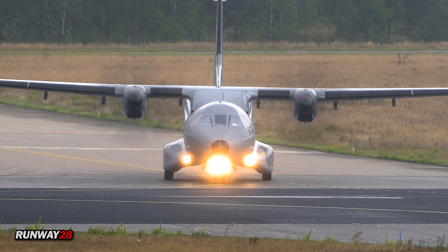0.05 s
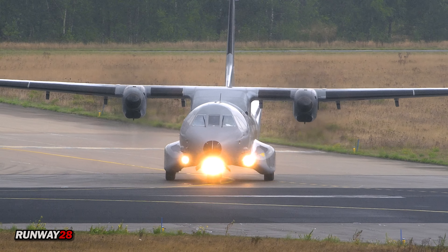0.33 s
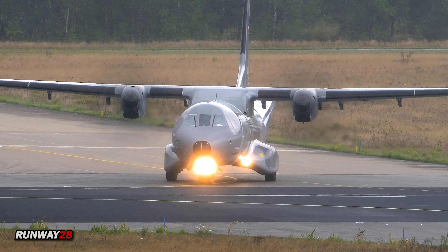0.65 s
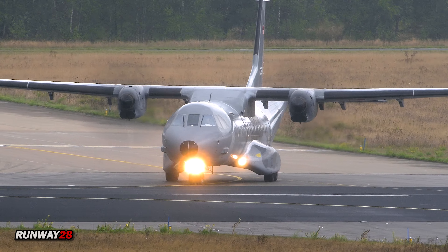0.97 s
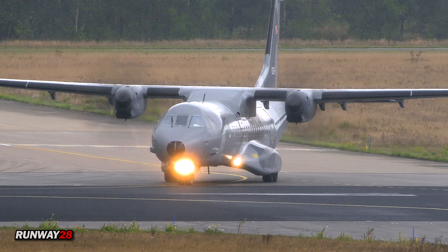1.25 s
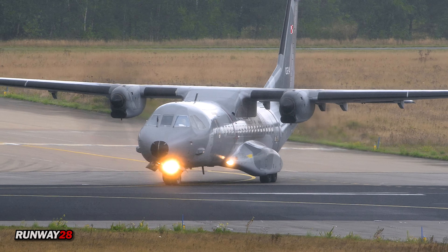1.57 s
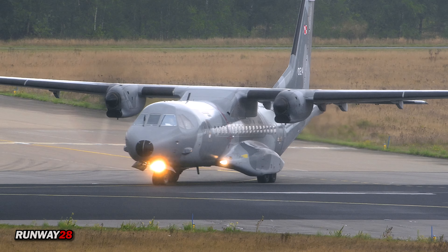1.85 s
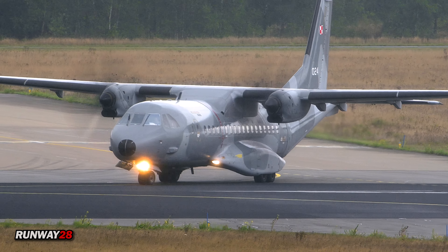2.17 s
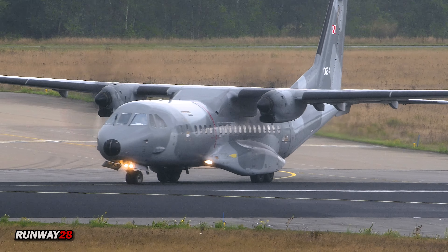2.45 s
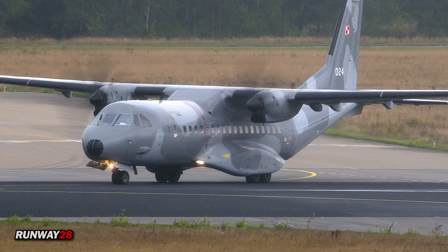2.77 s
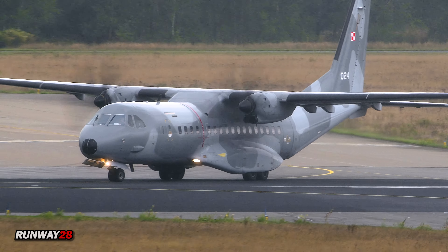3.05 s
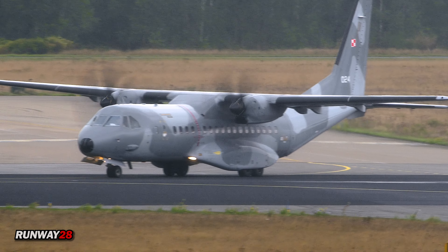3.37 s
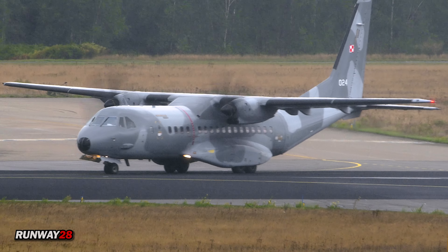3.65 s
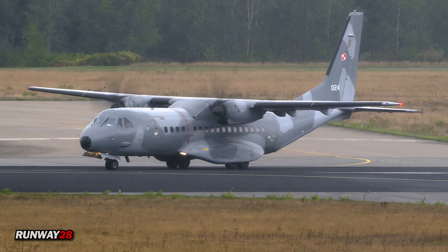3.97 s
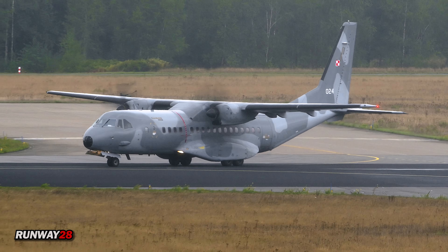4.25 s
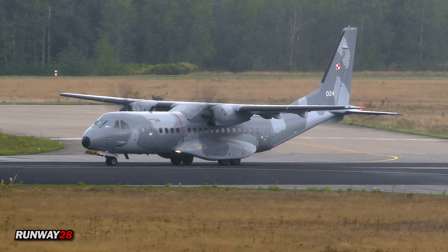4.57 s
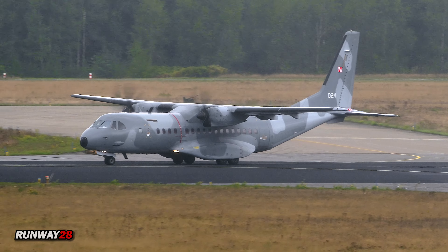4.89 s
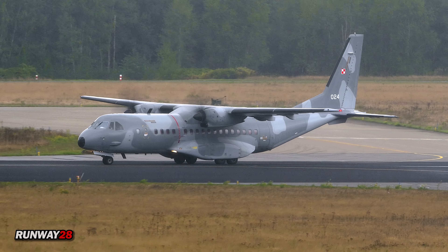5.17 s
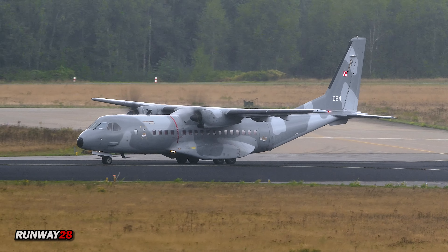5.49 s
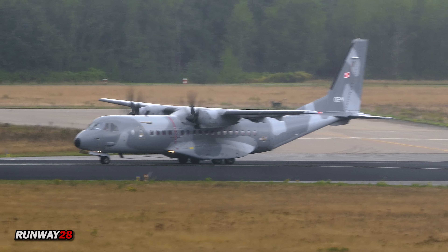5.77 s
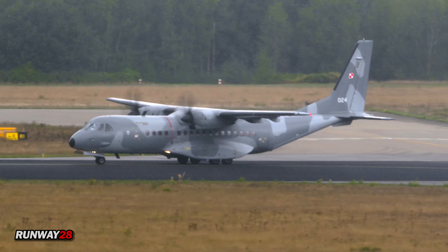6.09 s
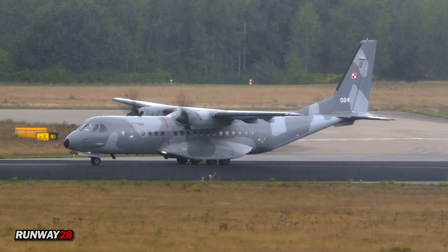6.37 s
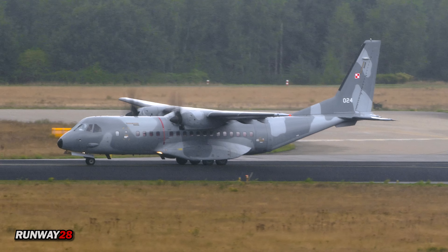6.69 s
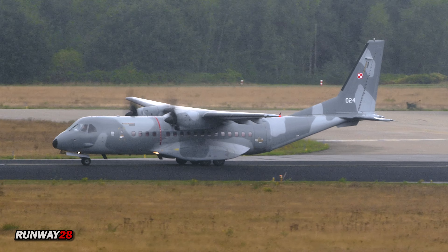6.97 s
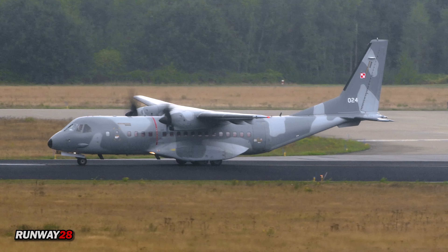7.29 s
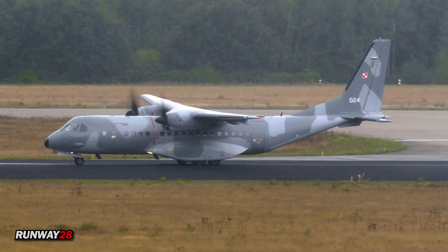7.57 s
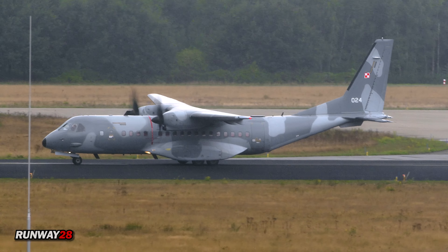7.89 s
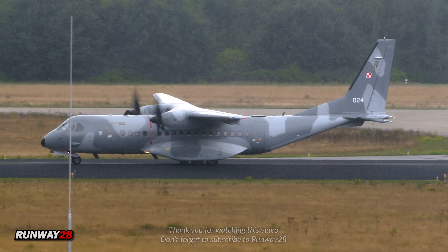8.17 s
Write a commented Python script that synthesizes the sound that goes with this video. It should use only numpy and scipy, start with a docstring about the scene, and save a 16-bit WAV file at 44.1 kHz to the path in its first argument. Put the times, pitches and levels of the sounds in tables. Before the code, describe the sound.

A continuous rushing roar and low propeller drone carry across an airfield to a distant microphone as a twin-engine transport plane taxis through a turn. The hum pulses at first, then grows buzzier, coming and going in waves while the roar wavers gently. One engine eases back slightly. Near the end an airy hiss rises and falls, and a faint high whine emerges as the throttle opens.

```python
"""An airfield, the microphone far off: a twin turboprop taxis towards it and turns side-on.
Two propellers hum at slightly different speeds inside the roar of their wash and the exhausts.
Their sound is beamed, so tones and bands of noise come and go as the nose swings away.
The intake hiss swells late in the turn; a thin turbine whine comes out as the throttle opens."""
import sys
import numpy as np
from scipy import signal
from scipy.fft import rfft, irfft
from scipy.io import wavfile
from scipy.ndimage import uniform_filter1d, minimum_filter1d

SR = 44100
rng = np.random.default_rng(int(sys.argv[2]) if len(sys.argv) > 2 else 0)


def pcm_store(signal):
    """Save signal as 16-bit PCM."""
    levels = np.round(np.clip(np.atleast_2d(signal), -1, 1) * 32767)
    wavfile.write(sys.argv[1], SR, levels.astype(np.int16).T)


N = 363384
T = np.arange(N) / SR
FREQS = np.fft.rfftfreq(N, 1 / SR)

# the turn: t/s, angle between nose and microphone/deg
HEADING = [(0, 2), (2, 28), (3, 39), (8.24, 80)]
# the high wash, coming and going on the wind: t/s, relative level/dB
WASH_LEVEL = [(0, -15), (1.5, -16), (2.0, -15), (2.7, -16), (3.7, -13), (4.8, -15), (5.5, -14),
              (6.6, -16.5), (8.24, -17.5)]


def amp(db):
    return 10 ** (np.asarray(db) / 20)


def unit(x):
    return x / np.sqrt(np.mean(x ** 2) + 1e-20)


def bell(x, middle, width):
    """A smooth hump of height 1."""
    return np.exp(-(2 * (x - middle) / width) ** 2)


def step(x, softness):
    """A smooth rise from 0 to 1 as x passes zero."""
    return .5 + .5 * np.tanh(x / softness / 2)


def curves(rows, t=T):
    """Each column of a table, joined by straight lines in time."""
    s, *columns = np.transpose(rows)
    return [np.interp(t, s, column) for column in columns]


def coloured(noise, spectrum):
    """Noise filtered by rows of f/Hz, gain/dB, joined on a log-frequency axis."""
    hz, db = np.transpose(spectrum)
    return irfft(rfft(noise) * amp(np.interp(np.log(FREQS + 1), np.log(hz + 1), db)), N)


def drift(rate_hz):
    """Smooth random motion of unit size, up to about the given rate."""
    return unit(irfft(rfft(rng.standard_normal(N)) * np.exp(-.5 * (FREQS / rate_hz) ** 2), N))


def whistle(hz, width_hz):
    """A narrow band of noise around a moving pitch."""
    carrier = np.exp(2j * np.pi * np.cumsum(hz) / SR)
    return unit((carrier * (drift(width_hz / 2) + 1j * drift(width_hz / 2))).real)


def swelling(name, steady):
    """A tone's steady gain with its swells on top, added as power."""
    # moments when a tone swells at the microphone: tone, middle t/s, length/s, level/dB
    swells = [("right bass", 0, .4, -41.5), ("right bass", 1.2, .55, -45.5), ("right thrust", .05, .3, -21),
              ("right thrust", .56, .22, -21), ("right thrust", 1.42, 0.55, -24.5),
              ("right thrust", 1.9, 0.18, -28), ("left hum", 1.56, 0.26, -18),
              ("left hum", 2.3, .18, -20.5), ("left hum", 2.78, 0.61, -18.5),
              ("left hum", 3.3, 0.22, -20.5), ("left hum", 7.68, 0.45, -19), ("left buzz", 1.35, 0.94, -23),
              ("left buzz", 2.3, .4, -24), ("left buzz", 2.9, 0.99, -20), ("right buzz", 4.5, 0.4, -19.5),
              ("right buzz", 4.88, 0.27, -20.5), ("right buzz", 5.18, 0.29, -16.5),
              ("right buzz", 6.18, 0.3, -18), ("right buzz", 7.2, .2, -23), ("right buzz", 7.83, .7, -20.5),
              ("whine", 1.3, 0.42, -65), ("whine", 3.1, .45, -66), ("whine", 4.0, .4, -64.5),
              ("whine", 7.15, .3, -66), ("whine", 7.6, .45, -60.5)]
    power = sum((amp(db) * bell(T, s, length)) ** 2 for tone, s, length, db in swells if tone == name)
    return np.sqrt(steady ** 2 + power)


def electronics():
    """The faint, wavering whine of the recorder's own circuits."""
    # its tones: f/Hz, level/dB
    tones = [(6000, -76.5), (7000, -83), (8000, -89), (9000, -98), (10000, -98), (11000, -100),
             (12000, -101)]
    return sum(amp(db) * unit((1 + .6 * drift(1.5)) * np.sin(2 * np.pi * hz * T)) for hz, db in tones)


def stereo_spread():
    """A trace of noise in opposite sign on the two channels, rising and falling with the wash."""
    # its spectrum: f/Hz, relative level/dB
    spectrum = [(100, -65.5), (300, -35.5), (500, -23.5), (700, -13.5), (1000, 2.5), (1350, -1.5),
                (1850, -14), (3600, -11.5), (4600, -25), (6000, -56), (10000, -100)]
    noise = coloured(rng.standard_normal(N), spectrum)
    return amp(-51.5) * np.outer([1, -1], unit(noise * amp(curves(WASH_LEVEL)[0])))


def turbine():
    """The compressor's whine: a narrow core in a wide, airy skirt, louder once the throttle opens."""
    # turbine speed, heard as pitch: t/s, f/Hz
    pitch = [(0, 5420), (3.85, 5360), (4.4, 5050), (6.2, 4600), (6.9, 5020), (7.35, 5460), (7.7, 5510),
             (8.24, 5420)]
    idle_db, power_db, throttle_s = -71, -60.5, 7.28
    hz = curves(pitch)[0] * (1 + .0018 * drift(9))
    db = idle_db + (power_db - idle_db) * step(T - throttle_s, softness=.08)
    return swelling("whine", amp(db)) * unit(whistle(hz, width_hz=45) + whistle(hz, width_hz=260))


def swishes():
    """Short gliding whistles of air that rise out of the wash."""
    # each swish: middle t/s, length/s, start f/Hz, end f/Hz, width/Hz, level/dB
    glides = [(0.422, 0.37, 835, 838, 59, -19), (6.322, 0.13, 3020, 3000, 350, -32.5),
              (6.861, 0.12, 3440, 2700, 400, -34), (7.217, .1, 2670, 3200, 200, -44.5)]
    out = np.zeros(N)
    for s, length, start_hz, end_hz, width_hz, db in glides:
        hz = np.interp((T - s) / length, [-.5, .5], [start_hz, end_hz])
        out += amp(db) * bell(T, s, length) * whistle(hz, width_hz)
    return out


def moving_band(rows, t, hz, width):
    """Lift or dip in dB of a band gliding through the roar; its width is a share of its centre pitch."""
    centre_hz, db = curves(rows, t)
    return db[:, None] * bell(hz / centre_hz[:, None], 1, width)


def roar_parts(t):
    """Centre pitch and relative dB over time of each part of the roar, from low to high."""
    # each part is thrown one way: name -> f/Hz, angle off the nose/deg, beam width/deg, gain/dB
    beams = {"rumble": (39, 3, 100, 6), "low drone": (140, 38, 56, 3.2), "exhaust": (250, 69, 71, 3),
             "low wash": (520, 28, 32, 2.1), "mid wash": (660, 15, 60, 1.7),
             "blade hiss": (1830, 62, 4.3, 1.3), "fizz": (4800, 63, 53, 4.2)}
    # the intake hiss: t/s, relative level/dB
    hiss_level = [(0, -26.5), (0.4, -34.5), (.7, -33), (1.7, -30.5), (2.1, -36.5), (2.7, -33.5),
                  (3.5, -35.5), (4.3, -32.5), (5.6, -31.5), (6.3, -28.5), (6.52, -28), (6.83, -25.5),
                  (7.15, -32), (8.24, -33.5)]
    wash_hz, hiss_hz = 1300, 3200
    heading = curves(HEADING, t)[0]
    parts = [(hz, db * bell(heading, aim, width)) for hz, aim, width, db in beams.values()]
    parts += [(wash_hz, curves(WASH_LEVEL, t)[0]), (hiss_hz, curves(hiss_level, t)[0])]
    parts.sort(key=lambda part: part[0])
    part_hz, levels_db = map(np.array, zip(*parts))
    surge_db = 2 * bell(t, middle=3.08, width=.4)  # the treble brightens once in mid-turn
    return part_hz, levels_db + np.outer(part_hz > 1800, surge_db)


def roar(flutter):
    """Turbulent wash and exhaust, chopped by the blades; its parts swell and fade with heading and wind."""
    # colour at the microphone, the treble lost to the long air path: f/Hz, relative level/dB
    spectrum = [(70, -38), (108, -32), (155, -15), (195, -3.5), (265, 1), (390, -5.5), (560, -4.5),
                (820, -0.5), (1030, -0.97), (1400, -5.5), (1900, -14), (2350, -16.5), (3000, -24.5),
                (3750, -27.5), (4750, -45), (5450, -52), (6900, -63.5), (7600, -75), (11000, -87),
                (13500, -95)]
    # band coloured by the echo off the ground, moving with the aircraft: t/s, f/Hz, gain/dB
    ground_echo = [(0, 409, -5.5), (1.0, 405, -3), (1.3, 470, 3), (2.0, 468, -1), (2.55, 460, 2),
                   (3.1, 350, 1), (3.7, 386, 2.5), (4.3, 450, 2), (4.8, 440, -1.5), (5.6, 470, -1),
                   (6.4, 430, 1.5), (7.1, 520, -1), (7.6, 575, -3), (8.24, 591, -1.5)]
    # hollow resonance of the wash, wandering with the turn: t/s, f/Hz, gain/dB
    resonance = [(0, 780, 1), (.7, 798, 1), (1.3, 950, 0.5), (2.0, 1080, 2.5), (2.4, 1047, 0.5),
                 (2.8, 950, -1.5), (3.4, 1077, 0.5), (4.35, 1020, 1.8), (4.75, 1020, -0.5),
                 (5.3, 1030, 2.3), (5.6, 1060, 1.5), (6.0, 1050, -1), (6.8, 1020, -1.5), (7.4, 970, 1.5),
                 (8.24, 970, 1)]
    window, hop = 1024, 256
    gust_db, gust_s = .17, .36  # wind along the path makes each part waver on its own
    frames, hz = N // hop + 5, np.fft.rfftfreq(window, 1 / SR)
    t = np.arange(frames) * hop / SR
    real, imag, patches = rng.standard_normal((3, frames, len(hz)))
    patches = uniform_filter1d(patches, size=22, axis=0)
    field_db = unit(uniform_filter1d(patches, size=9, axis=1))  # 1 dB patches in time and pitch
    field_db += moving_band(ground_echo, t, hz, width=.3) + moving_band(resonance, t, hz, width=.23)
    part_hz, levels_db = roar_parts(t)
    gusts = rng.standard_normal((len(part_hz), frames))
    gusts = unit(uniform_filter1d(gusts, size=round(gust_s * SR / hop), axis=1))
    for level_db, gust, own in zip(levels_db, gusts, np.eye(len(part_hz))):
        reach = np.interp(np.log(hz + 1), np.log(part_hz), own)  # each part fades into its neighbours
        field_db += np.outer(level_db - level_db.mean() + gust_db * gust, reach)
    spectra = (real + 1j * imag) * amp(field_db)
    noise = signal.istft(spectra.T, nperseg=window, noverlap=window - hop)[1][:N]
    return unit(coloured(flutter * noise, spectrum))


def blade_passes(rate, hunting):
    """Running count of blade passes, with a little hunting of the governor."""
    return np.cumsum(curves(rate)[0] * (1 + hunting * drift(4.2))) / SR


def chop(passes, buzz, depth):
    """Each passing blade throws a puff of wash: a flutter that follows the strength of the buzz."""
    puff = np.cos(2 * np.pi * passes) + .65 * np.cos(4 * np.pi * passes)
    return 1 + depth * buzz / buzz.max() * puff


def tone_gain(name):
    """Gain of a propeller tone as its forward beam swings away from the microphone with the nose."""
    # beams ahead of the nose: tone -> level inside/dB, level outside/dB, edge/deg
    beams = {"left hum": (-21.5, -34.5, 22.5), "left buzz": (-34, -30.5, 42),
             "right bass": (-46.5, -69, 25), "right thrust": (-16, -37.5, 7.2),
             "right buzz": (-28.5, -33, 6)}
    inside_db, outside_db, edge_deg = beams[name]
    ahead = step(edge_deg - curves(HEADING)[0], softness=2.4)
    return swelling(name, amp(inside_db) * ahead + amp(outside_db) * (1 - ahead))


def hum(passes, harmonics, scatter, flutter_hz, lift=lambda k: 0):
    """Harmonics of the blade rate; turbulent air on the way scatters the higher ones more."""
    out = np.zeros(N)
    for k, db in harmonics:
        share = np.clip(scatter * np.sqrt(k), 0, 1)
        scattered = (drift(flutter_hz) + 1j * drift(flutter_hz)) / np.sqrt(2)
        path = np.sqrt(1 - share ** 2) + share * scattered
        tone = np.exp(2j * np.pi * (k * passes + rng.random()))
        out += amp(db + lift(k)) * (path * tone).real
    return unit(out)


def buzz_focus(k):
    """Lift in dB of harmonic k: the strongest part of the buzz climbs as the nose swings away."""
    lifted_harmonic = 6.2 + .042 * curves(HEADING)[0]
    return 6 * bell(k, lifted_harmonic, width=1.7)


def left_propeller(passes):
    """The steady propeller: its blades beat out a low hum with a buzz above it."""
    # hum and buzz: multiple of the blade rate, relative level/dB
    hum_orders = [(2, -19), (3, 0), (4, -6.5)]
    buzz_orders = [(5, -8.5), (6, -2.5), (7, -1.2), (8, -.8), (9, -12), (10, -8), (11, -13), (12, -12),
                   (13, -12), (14, -14)]
    low = tone_gain("left hum") * hum(passes, hum_orders, scatter=.19, flutter_hz=6)
    buzz = tone_gain("left buzz") * hum(passes, buzz_orders, scatter=.125, flutter_hz=5, lift=buzz_focus)
    return low + buzz


def right_propeller(passes):
    """The propeller that slows for the turn: thrust tones and bass head-on, swells of buzz later."""
    # thrust tones and buzz: multiple of the blade rate, relative level/dB
    thrust_orders = [(2, 6), (3, -7.5)]
    buzz_orders = [(2, -18), (3, 4.5), (4, -11), (5, -9), (6, -3.5), (7, -8), (8, -16.5), (9, -6),
                   (10, -17), (11, -8.5), (12, -13.5)]
    thrust = tone_gain("right thrust") * hum(passes, thrust_orders, scatter=.19, flutter_hz=7)
    bass = tone_gain("right bass") * hum(passes, [(1, 0)], scatter=.25, flutter_hz=6)
    buzz = tone_gain("right buzz") * hum(passes, buzz_orders, scatter=.28, flutter_hz=8)
    return thrust + bass + buzz


def scene():
    """From this distance the aircraft reaches both channels almost alike."""
    # blade-passing rates, the right throttled back for the turn and opened up again: t/s, f/Hz
    left_rate = [(0, 88.4), (.6, 87.8), (1.9, 87.1), (2.6, 87.3), (3.2, 87.9), (6.2, 86.5), (8.24, 88.6)]
    right_rate = [(0, 100.6), (2.0, 98.6), (4.25, 97.6), (4.85, 95.1), (5.35, 92.4), (6.2, 83.5),
                  (7.15, 83.5), (7.7, 91), (8.24, 92)]
    left, right = blade_passes(left_rate, hunting=.0012), blade_passes(right_rate, hunting=.0017)
    wash = amp(-12.5) * roar(chop(left, tone_gain("left buzz"), depth=.125))
    propellers = left_propeller(left) + right_propeller(right)
    return wash + propellers + turbine() + swishes() + stereo_spread()


def record(dry):
    """Behind the microphone: the electronics whine, a limiter holds peaks down, a low-pass cuts the top."""
    ceiling, cutoff_hz = .71, 15700
    sound = dry + electronics()
    gain = np.minimum(1, ceiling / (abs(sound).max(0) + 1e-9))
    held = minimum_filter1d(gain, size=281)
    eased = uniform_filter1d(uniform_filter1d(held, size=141), size=141)
    lowpass = signal.firwin(511, cutoff_hz, window=("kaiser", 9), fs=SR)
    return signal.oaconvolve(sound * eased, lowpass[None], "same")


dry = scene()
out = record(dry)
pcm_store(out)
```